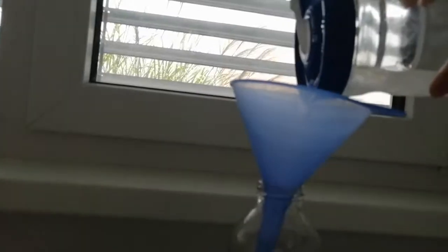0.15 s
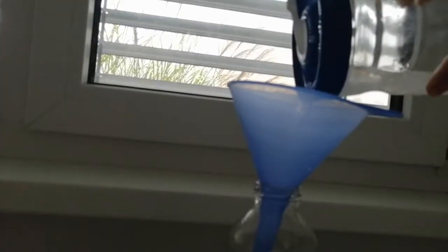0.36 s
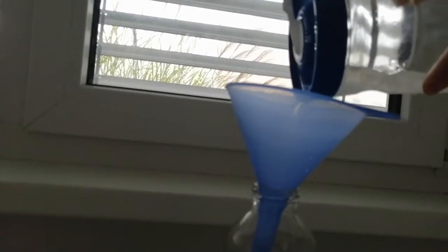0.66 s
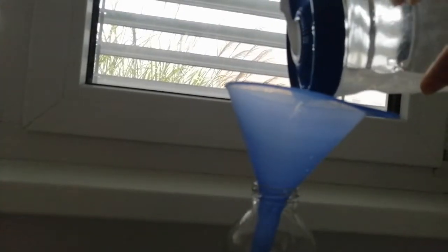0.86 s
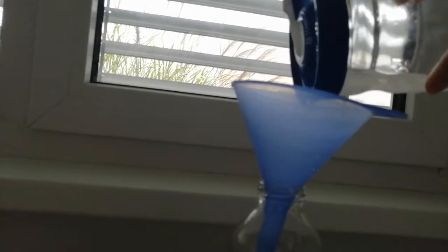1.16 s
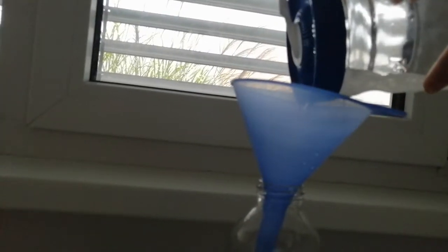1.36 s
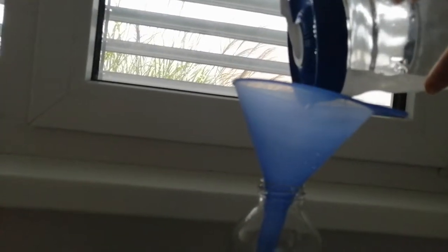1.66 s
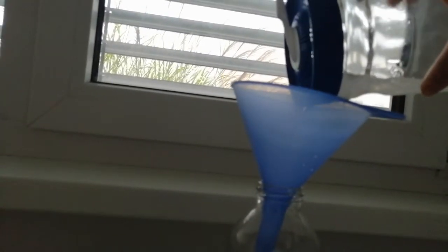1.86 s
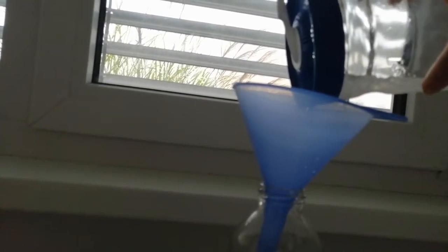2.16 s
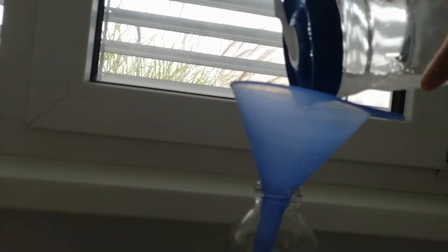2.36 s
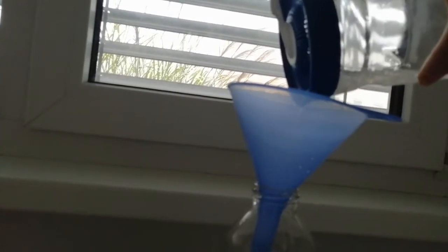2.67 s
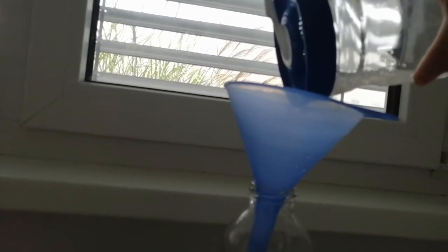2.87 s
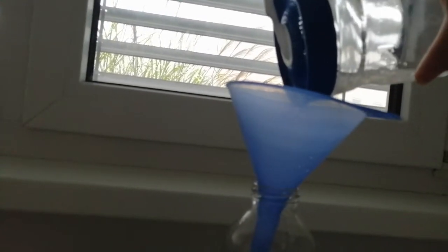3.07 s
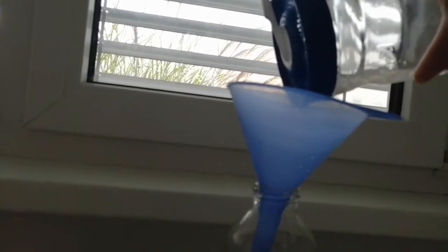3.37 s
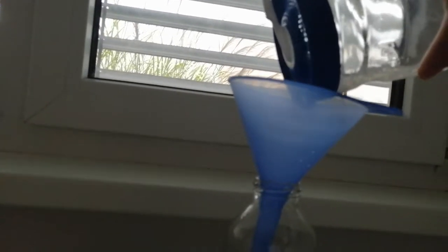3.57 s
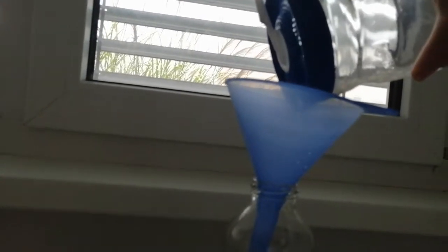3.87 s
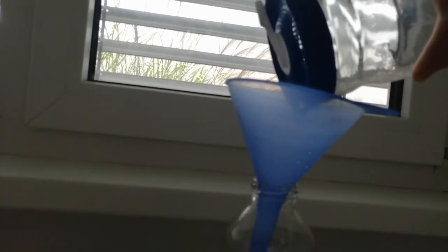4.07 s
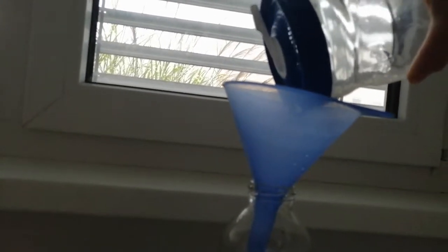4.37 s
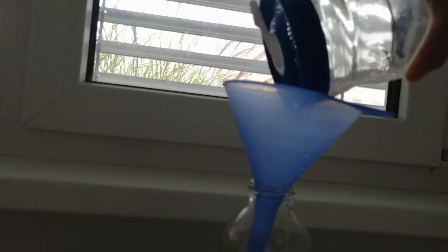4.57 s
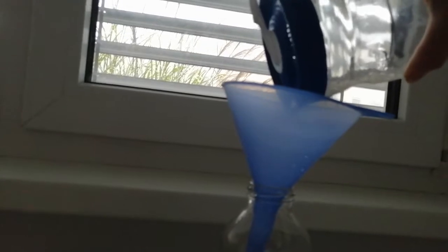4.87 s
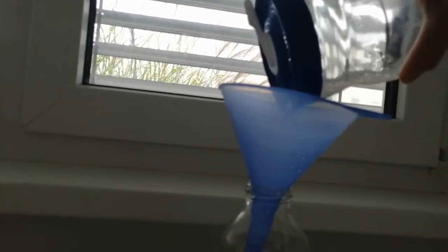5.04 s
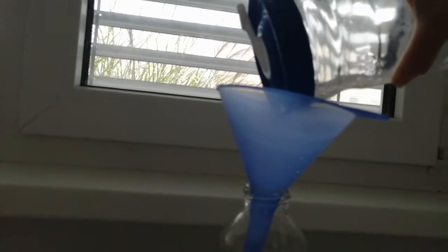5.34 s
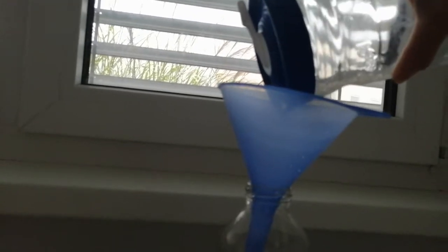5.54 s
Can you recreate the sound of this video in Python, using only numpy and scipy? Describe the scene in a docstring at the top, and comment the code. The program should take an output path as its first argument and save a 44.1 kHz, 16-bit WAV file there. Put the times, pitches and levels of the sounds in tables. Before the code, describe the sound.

A strong gurgling pour with hollow thumps rises in pitch, breaks into tinkling bubbles and droplets, and ends in near silence.

```python
"""Liquid pours from a jar's slotted lid into a plastic funnel on a glass bottle, close by in a window recess.
At first the full jet drums on the funnel; deep gulps ring as air bubbles and thump the hollow vessels.
As the stream thins the gulps rise in pitch, spray ticks, bubbles run in chains and the glass rings along.
Then lone bubbles sing, the last drips ping and a hand makes the microphone rumble, over faint room noise."""
import sys
import numpy as np
from scipy import signal
from scipy.fft import rfft, irfft
from scipy.io import wavfile

SR = 44100
rng = np.random.default_rng(int(sys.argv[2]) if len(sys.argv) > 2 else 0)


def generate_wav(signal):
    """Clip the signal to [-1, 1] and save it as 16-bit WAV at the path in sys.argv[1]."""
    frames = np.transpose(np.atleast_2d(signal))
    scaled = np.clip(frames, -1, 1) * 32767
    pcm = np.round(scaled).astype(np.int16)
    wavfile.write(sys.argv[1], SR, pcm)


N = 251811
TIME = np.arange(N) / SR

# the loud gulps: (time [s], strength [dB], bubble pitch [Hz], thump [dB])
GULPS = [(0.002, -26.5, 317.7, -37.5), (0.124, -51, 554, -56), (0.225, -34, 277, -40.5),
         (0.529, -41, 284, -43), (0.301, -39.5, 728, -39.5), (0.317, -23.5, 306, -34),
         (0.337, -25, 320, -39.5), (0.381, -41, 726, -37), (0.421, -25, 323, -51), (0.423, -41.5, 950, -62),
         (0.427, -43, 690, -61), (0.494, -48, 550, -40), (0.571, -23.5, 327.6, -32), (0.619, -45, 678, -40),
         (0.658, -27, 325, -33), (0.706, -25, 323, -41), (0.711, -37.5, 697, -78), (0.797, -35.5, 900, -37),
         (0.801, -39, 688, -42), (0.898, -43, 753, -41), (1.049, -46, 555, -65), (1.093, -35.5, 700, -43),
         (1.183, -35, 983, -32.5), (1.186, -27.5, 595, -61), (1.283, -40, 1014, -74),
         (1.303, -45.5, 940, -65), (1.334, -35.5, 950, -75), (1.389, -24.5, 924, -39.5),
         (1.429, -32, 1220, -69), (1.48, -38.5, 804, -43), (1.683, -42, 580, -45),
         (1.736, -35.5, 1134, -36.5), (1.81, -38.5, 1005, -73), (1.945, -43.5, 908, -67),
         (1.983, -42.5, 830, -75), (2.025, -35, 997, -51.5), (2.098, -43, 1000, -60),
         (2.153, -37.5, 980, -60), (2.172, -43, 960, -59), (2.216, -35, 956, -53), (2.245, -41.5, 957, -56),
         (2.265, -35, 870, -48.5), (2.297, -39, 950, -66), (2.318, -32.5, 840, -46), (2.422, -48, 817, -77),
         (2.532, -36.5, 750, -72), (2.547, -37, 290, -53), (2.563, -32.5, 718, -74),
         (2.769, -33.5, 1340, -48.5), (2.789, -37, 1170, -78), (2.85, -34.5, 1196, -46),
         (2.914, -38, 1520, -50.5), (3.032, -40.5, 1099, -49), (3.1, -37.5, 907, -51),
         (3.211, -53, 1740, -58), (3.266, -43.5, 1115, -56.5), (3.395, -42.5, 1436, -53.5),
         (3.607, -35.5, 1105, -48), (3.615, -39.5, 1230, -90), (3.714, -41.5, 1624, -61.5),
         (3.752, -45, 1440, -62), (3.818, -41, 1330, -52.5), (3.835, -42.5, 1236, -70),
         (3.902, -47, 1923, -63)]
# lone bubbles that sing on as the stream turns to drips, and long rings of the glass near 2050 Hz: (time [s],
# pitch [Hz], level [dB], ringing [cycles])
SINGERS = [(2.892, 1890, -45, 510), (3.212, 2047, -49, 1200), (3.905, 1853, -51, 580),
           (3.904, 2045, -55, 950), (4.239, 1560, -60.5, 107), (4.356, 1732, -58.5, 290),
           (5.581, 2965, -59.5, 420)]
# chains of bubbles dragged down by the thread of liquid:
# (time [s], length [s], first pitch [Hz], last pitch [Hz], level [dB])
CHAINS = [(0.94, 0.14, 875, 907, -47.5), (1.393, 0.11, 926, 763, -44.5), (1.507, 0.077, 576, 563, -47.5),
          (1.77, 0.081, 870, 706, -44.5), (1.984, 0.074, 816, 1110, -46.5), (2.1, 0.098, 974, 980, -47.5),
          (2.225, 0.096, 946, 950, -41), (2.335, 0.19, 850, 815, -52.5), (2.513, .14, 822, 650, -47.5),
          (2.779, 0.084, 1350, 1190, -45), (2.96, 0.044, 1820, 1680, -47.5),
          (3.039, 0.085, 1020, 947, -42.5), (3.269, 0.055, 1060, 1030, -46.5),
          (3.673, 0.068, 2160, 1600, -53.5)]
# the clearest droplets and tiny bursting bubbles: (time [s], strength [dB], pitch [Hz])
DROPS = [(0.056, -40, 5750), (0.0775, -33.5, 5720), (0.1324, -42.5, 5560), (0.1733, -32.5, 2505),
         (0.249, -38, 1577), (0.248, -44.5, 2580), (0.2858, -39.5, 6030), (0.381, -50, 6000),
         (0.47, -44, 1670), (0.5666, -52.5, 4370), (0.974, -51.5, 7760), (1.095, -47.5, 1890),
         (1.1574, -49, 2600), (1.159, -44, 1587), (1.215, -52.5, 7160), (1.4303, -44.5, 2565),
         (1.502, -47.5, 2620), (1.505, -40, 1653), (1.736, -56.5, 6040), (1.945, -51, 4300),
         (1.95, -50, 6970), (2.025, -40, 1790), (2.123, -53, 5730), (2.2648, -43.5, 1976),
         (2.295, -47.5, 9350), (2.389, -52.5, 5560), (2.529, -47, 4200), (2.56, -57, 2480),
         (2.62, -53, 2450), (2.729, -48.5, 2280), (2.756, -47, 4270), (2.832, -41.5, 3040),
         (2.873, -48, 3040), (2.924, -44.5, 4190), (2.973, -48.5, 1845), (2.986, -50, 6680),
         (3.204, -47, 2800), (3.211, -47, 2970), (3.2854, -46.5, 4080), (3.3953, -46.5, 6700),
         (3.3967, -44.5, 2464), (3.574, -43.5, 6800), (3.66, -50, 4110), (3.6742, -52.5, 2860),
         (3.7115, -52.5, 4240), (3.788, -51.5, 2434), (3.8265, -48, 2442), (3.83, -53, 3280)]
# fat drips that burst into a broad splash: (time [s], strength [dB], centre [Hz])
SPLASHES = [(0.076, -44, 5030), (0.286, -53, 4860), (1.432, -51.5, 3840), (2.832, -46, 2680),
            (2.924, -63, 3970), (3.205, -42, 2680), (3.394, -46, 2530), (3.83, -55.5, 2900)]
# last drips into calm liquid: (time [s], strength [dB], pitch [Hz], splash against the ping [dB])
DRIPS = [(4.2113, -53.5, 12800, -9), (4.227, -47.5, 6620, -3.5), (4.6473, -55, 11700, -5.5),
         (5.088, -53.5, 4210, -6), (5.5278, -60.5, 6650, -7), (5.539, -63, 5970, -14)]
# surges down the spout that make the hollow below boom: (time [s], level [dB])
SURGES = [(0.124, -37.5), (0.189, -39.5), (0.311, -39), (0.438, -39.5), (1.391, -54), (1.47, -45),
          (1.571, -49.5), (1.945, -45), (2.232, -47), (2.279, -47), (2.344, -46.5), (2.864, -50),
          (2.939, -49.5), (3.394, -54.5)]

# strength of the stream, which drives churning, burbling and spray: (time [s], level [dB])
FLOW = [(0.0, -34.5), (0.53, -34), (0.92, -36), (1.5, -37.5), (2.27, -55), (2.62, -44), (2.9, -61),
        (4.2, -79)]
# patter of the thinning stream on the shallow pool: (time [s], level [dB])
PATTER = [(1.0, -87), (2.0, -69), (2.6, -71), (3.1, -82.5)]
# the glass rings more freely as the jar empties: (time [s], level [dB])
GLASS_FREE = [(0, -25), (1.8, 16), (2.8, 18.5), (4, 19.5)]
# handling of the microphone: (time [s], level [dB])
HANDLING = [(5.044, -100), (5.288, -44), (5.386, -72), (5.442, -50.5), (5.7, -55.5)]

# bubble sizes in the deep gurgle under the full stream: (pitch [Hz], level [dB])
GURGLE = [(235, 0.5), (275, 6.5), (370, -3.5)]
# bubble sizes in the burble: (pitch [Hz], level [dB])
BURBLE = [(500, -3.5), (700, -1), (950, 8.5), (1300, -10.5), (1650, 7.5), (2200, -18.5)]
# bubble sizes where the full jet hits the funnel wall: (pitch [Hz], level [dB])
JET_SIZES = [(1350, -2), (1630, 22), (2100, -30)]
# bubble sizes in the spray: (pitch [Hz], level [dB])
SPRAY = [(2200, -4.5), (3200, 4.5), (4500, 2.5), (6000, 6), (8500, 3.5), (12000, 10), (15000, -7)]

# air resonances of funnel and bottle: (frequency [Hz], t60 [s], level [dB])
FUNNEL = [(543, 0.055, 9.5), (697, 0.16, 4), (825, 0.27, 0), (908, 0.1, 2), (1033, 0.17, -5),
          (1179.4, 0.08, 0.5), (1546, 0.11, -4), (1617, 0.16, -1)]
# ring of the glass: (frequency [Hz], t60 [s], level [dB])
GLASS = [(1901, 0.22, -4), (2086, 1, -4), (2417, 0.27, -1.5), (2670, 0.37, -9.5), (3196, 0.062, -12),
         (5000, 0.35, -11)]
# hollow resonances of the vessels and the recess: (frequency [Hz], t60 [s], level [dB])
HOLLOW = [(59.1, 0.92, 2), (122.2, 0.22, 8), (206.6, 0.058, -7.5), (273.2, 0.23, 10), (324.4, 0.19, 7)]
# valleys between the resonances of the vessels: (frequency [Hz], width [Hz], depth [dB])
VALLEYS = [(504, 110, -25), (1394, 380, -3.5)]
# how the two microphones hear the funnel: (frequency [Hz], left minus right [dB])
BALANCE = [(300, 0), (690, -8.5), (950, 0), (1300, -2), (2400, -2.5), (5000, -2), (8000, -6), (12000, 3.5)]
# colour of the quiet room: (frequency [Hz], density [dB per Hz])
AMBIENCE = [(20, -6), (90, -1), (128, -1.5), (200, -13.5), (300, -6.5), (480, -17.5), (1500, -21),
            (4000, -28), (7500, -34.5), (9000, -40.5), (15000, -43)]

# weak gulps come at random and shrink, so rise in pitch, as the jar empties
SMALL_GULP_HZ, SMALL_GULP_RISE_OCT_PER_S, SMALL_GULP_SPREAD_OCT = 568, 0.314, 0.3
# at first the full jet drums on the funnel wall; later the stream runs dry
JET_ENDS_S, JET_FADE_T60_S = 0.55, 0.59
DRY_S, DRY_FADE_T60_S, DRAIN_T60_S = 3.88, 0.63, 9
# the thinning stream spurts after each gulp; a full lull ends up this far below a fresh spurt
SPURT_T60_S, LULL_DB = 0.23, -5.5
AMBIENCE_DB, TOP_HZ = -69, 15200


def undb(db):
    """Decibels to gain."""
    return 10 ** (np.asarray(db) / 20)


def unit(x):
    """Scale to rms 1."""
    return x / np.sqrt(np.mean(x ** 2))


def curve(table):
    """Gain over time from a (time [s], level [dB]) table."""
    times, levels = np.array(table).T
    return undb(np.interp(TIME, times, levels))


def shape(points, hz):
    """Gain of a (frequency [Hz], level [dB]) spectrum at the given frequencies."""
    corners, levels = np.array(points).T
    return undb(np.interp(np.log(hz + 1), np.log(corners), levels))


def band(x, lo_hz, hi_hz, order=2):
    """Causal band-pass."""
    edges = [lo_hz, min(hi_hz, SR / 2 - 1)]
    return signal.sosfilt(signal.butter(order, edges, "band", fs=SR, output="sos"), x)


def fade(t, t60):
    """Exponential decay, 60 dB down after t60 seconds."""
    return np.exp(-np.log(1000) * t / t60)


def until(s, t60):
    """Gain that holds at 1 up to a time and then dies away."""
    return fade(np.maximum(TIME - s, 0), t60)


def add(track, s, sound):
    """Mix a sound in at a time."""
    start = int(np.clip(s * SR, 0, N - 1))
    track[start:start + len(sound)] += sound[:N - start]


def convolve(x, response):
    """Pass a sound through an impulse response."""
    return signal.fftconvolve(x, response)[:N]


def bubble(hz, cycles, glide, rise):
    """An air pocket swells over `rise` cycles and rings on; its pitch climbs by the share `glide` as it surfaces."""
    life = cycles / hz
    t = TIME[:int(life * SR) + 2]
    swell = (1 - np.exp(-hz * t / rise)) * fade(t, life)
    tone = np.sin(2 * np.pi * hz * t * (1 + glide * t / life / 2))
    return swell / swell.max() * tone


def burst(lo_hz, hi_hz, t60, attack_s):
    """A short wet crack of band-passed noise, its envelope peaking at 1."""
    t = TIME[:SR // 10]
    noise = rng.standard_normal(len(t)) * (1 - np.exp(-t / attack_s)) * fade(t, t60)
    crack = band(noise, lo_hz, hi_hz, order=3)
    return crack / np.abs(signal.hilbert(crack)).max()


def swarm(sizes, cycles, glide, rise, scatter_db, count):
    """Many bubbles at random times, rms 1; positive scatter makes a few much louder than the rest."""
    out = np.zeros(N)
    when, size, loud, life = rng.random((count, 4)).T
    lo, hi = sizes[0][0], sizes[-1][0]
    pitches = lo * (hi / lo) ** size
    gains = shape(sizes, pitches) * undb(-scatter_db * np.log(np.maximum(loud, 1 / 20)))
    lengths = cycles * (.5 + life)
    for s, hz, gain, length in zip(when * TIME[-1], pitches, gains, lengths):
        add(out, s, gain * bubble(hz, length, glide, rise))
    return unit(out)


def flow():
    """Strength of the stream over time, 1 at its fullest."""
    strength = curve(FLOW)
    return strength / strength.max()


def spurts():
    """Gain of the stream: strongest just after a gulp, sinking into lulls that deepen as it thins."""
    surge = np.minimum(sum((TIME >= row[0]) * until(row[0], SPURT_T60_S) for row in GULPS), 1)
    thinness = np.minimum(TIME / DRY_S, 1)
    return undb(LULL_DB * thinness * (1.5 - surge))


def gulps(rows, cycles=31, glide=0.074, rise=1.76, bubble_db=-3,
          splash_db=-20, splash_db_per_oct=5.0, splash_t60=0.029, splash_hz=880, slap_db=-7,
          trail_db=-11, trail_s=0.054, trail_t60=0.8, trail_spread=0.19):
    """Each gulp traps one large bubble and throws up a splash; a string of like-sized bubbles breaks off after it."""
    out = np.zeros(N)
    deepest_hz = min(row[2] for row in rows)
    for s, db, hz, *_ in rows:
        add(out, s, undb(db + bubble_db) * bubble(hz, cycles, glide, rise))
        # smaller gulps splash brighter, and more for their size
        wet_hz = splash_hz * (hz / deepest_hz) ** 0.29
        wet_db = db + splash_db + splash_db_per_oct * np.log2(hz / deepest_hz)
        add(out, s, undb(wet_db) * burst(wet_hz / 1.79, wet_hz * 1.217, splash_t60, attack_s=0.0064))
        add(out, s, undb(wet_db + slap_db) * burst(690, 1800, splash_t60, attack_s=0.00034))
        for late, size in rng.random(size=(4, 2)):
            delay = trail_s * late
            trailing = bubble(hz * (1 + trail_spread * (2 * size - 1)), cycles, glide, rise)
            add(out, s + delay, undb(db + bubble_db + trail_db) * fade(delay, trail_t60) * trailing)
    return out


def small_gulps(small_db=-47, flow_power=0.22, scatter_db=3, count=32):
    """Rows of weak gulps, unevenly spaced through the pour; they weaken with the stream."""
    late, size, loud = rng.random((count, 3)).T
    times = (np.arange(count) + late) / count * DRY_S
    octaves = SMALL_GULP_RISE_OCT_PER_S * times + SMALL_GULP_SPREAD_OCT * (2 * size - 1)
    pitches = SMALL_GULP_HZ * 2 ** octaves
    stream_db = 20 * np.log10(np.interp(times, TIME, flow() * spurts()))
    levels = small_db + flow_power * stream_db + scatter_db * (2 * loud - 1)
    return list(zip(times, levels, pitches))


def trickle(gurgle_db=-43.0, gurgle_power=4.2, burble_db=-56.5, burble_power=0.36,
            jet_db=-61, rush_db=-63, spray_db=-75, crackle_db=-76, spray_power=0.026,
            jet_spray_db=6, jet_spray_t60=1.2):
    """The stream gurgles deeply while full, burbles with mid-sized bubbles, fizzes and crackles with fine ones."""
    gurgle = swarm(GURGLE, cycles=37.0, glide=0.025, rise=0.46, scatter_db=-0.5, count=1400)
    burble = swarm(BURBLE, cycles=28.3, glide=0.12, rise=0.44, scatter_db=4.5, count=5500)
    bubbling = undb(gurgle_db) * gurgle * flow() ** gurgle_power
    bubbling += undb(burble_db) * burble * flow() ** burble_power
    # the full jet drums and rushes on the funnel wall
    drumming = swarm(JET_SIZES, cycles=35, glide=0.024, rise=1.0, scatter_db=0, count=4000)
    rush = unit(band(rng.standard_normal(N), 830, 2060))
    jet = (undb(jet_db) * drumming + undb(rush_db) * rush) * until(JET_ENDS_S, JET_FADE_T60_S)
    spray = swarm(SPRAY, cycles=47, glide=0.051, rise=2.2, scatter_db=6.0, count=4500)
    crackle = swarm(SPRAY, cycles=18, glide=0, rise=.8, scatter_db=7, count=350)
    # the first gush throws extra spray
    gush = 1 + undb(jet_spray_db) * fade(TIME, jet_spray_t60)
    fine = (undb(spray_db) * spray + undb(crackle_db) * crackle) * flow() ** spray_power * gush
    return spurts() * until(DRY_S, DRY_FADE_T60_S) * (bubbling + jet + fine)


def chains(chain_db=-4, spread=0.04, cycles=26, glide=0.0097):
    """Bubbles follow each other closely and grow or shrink along a chain, so its pitch glides."""
    out = np.zeros(N)
    for start, length, first_hz, last_hz, db in CHAINS:
        chance = rng.random(size=(14, 3))
        for k, (late, size, loud) in enumerate(chance):
            along = (k + late) / len(chance)
            hz = (first_hz + (last_hz - first_hz) * along) * (1 + spread * (2 * size - 1))
            gain = undb(db + chain_db) * (.5 + loud)
            add(out, start + along * length, gain * bubble(hz, cycles, glide, rise=0.79))
    return out


def drops(cycles=80, glide=.03, rise=2, ping_db=-3, click_db=-11, click_t60=0.027,
          fizz_db=-8, fizz_t60=0.0074,
          spatter_db=-14, spatter_s=0.039, spatter_oct=0.32, spatter_cycles=30):
    """Each droplet gives a click, a fizz, the high ping of a tiny bubble and a spatter of others near its size."""
    out = np.zeros(N)
    for s, db, hz in DROPS:
        add(out, s, undb(db + ping_db) * bubble(hz, cycles, glide, rise))
        add(out, s, undb(db + fizz_db) * burst(hz / 1.22, hz * 1.194, fizz_t60, attack_s=0.0016))
        add(out, s, undb(db + click_db) * burst(2800, 10500, click_t60, attack_s=0.0002))
        for late, size in rng.random(size=(5, 2)):
            speck = bubble(hz * 2 ** (spatter_oct * (2 * size - 1)), spatter_cycles, glide, rise)
            add(out, s + spatter_s * late, undb(db + spatter_db) * (1 - late / 2) * speck)
    return out


def splashes(width=1.18, splash_t60=0.081):
    """A fat drip cracks on the pool and scatters into a broad, quickly dying splash."""
    out = np.zeros(N)
    for s, db, hz in SPLASHES:
        add(out, s, undb(db) * burst(hz / width, hz * width, splash_t60, attack_s=0.00087))
    return out


def patter():
    """Small bubbles crowd between the gulps once the stream is thin, and keep nudging the glass."""
    crowd = swarm([(1700, 0), (3400, -2)], cycles=30, glide=0.027, rise=1, scatter_db=5, count=1300)
    return crowd * curve(PATTER) * spurts() * until(DRY_S, DRY_FADE_T60_S)


def singers(sing_db=-3, climb_cycles=18):
    """Lone bubbles in calm liquid, and the glass near 2050 Hz, ring long and clean; the fewer the cycles, the
    more the pitch climbs."""
    out = np.zeros(N)
    for s, hz, db, cycles in SINGERS:
        add(out, s, undb(db + sing_db) * bubble(hz, cycles, climb_cycles / cycles, rise=6.5))
    return out


def drips(ping_db=-3, cycles=170, glide=0.059, splash_t60=0.024, splash_width=0.31, click_db=-17):
    """The last drips ping in calm liquid, each with a faint click and a narrow splash around its pitch."""
    out = np.zeros(N)
    edge = 1 + splash_width / 2
    for s, db, hz, splash_db in DRIPS:
        add(out, s, undb(db + ping_db) * bubble(hz, cycles, glide, rise=0.73))
        add(out, s, undb(db + splash_db) * burst(hz / edge, hz * edge, splash_t60, attack_s=0.0021))
        add(out, s, undb(db + click_db) * burst(2500, 11000, 0.11, attack_s=0.00076))
    return out


def valleys(x):
    """Between their resonances the vessels pass little sound."""
    for hz, width_hz, db in VALLEYS:
        x = x - (1 - undb(db)) * band(x, hz - width_hz / 2, hz + width_hz / 2, order=1)
    return x


def resonate(x, modes, wander, wander_hz=9):
    """Modes whose pitch wanders by a share as the liquid sloshes; each level is the gain at its resonance."""
    out = np.zeros(N)
    for hz, t60, db in modes:
        slosh = np.interp(TIME * wander_hz, np.arange(300), rng.standard_normal(size=300))
        turn = np.exp(2j * np.pi * np.cumsum(hz * (1 + wander * slosh)) / SR)
        keep = fade(1 / SR, t60)
        # shift the mode down to 0 Hz, smooth it there, and shift it back up
        smoothed = signal.lfilter([1 - keep], [1, -keep], x * turn.conj())
        out += 2 * undb(db) * (turn * smoothed).real
    return out


def ring(modes):
    """Impulse response of a set of decaying modes; each level is the gain at its resonance."""
    t = TIME[:SR]
    response = np.zeros(len(t))
    for hz, t60, db in modes:
        decay = fade(t, t60)
        response += 2 * undb(db) * decay / decay.sum() * np.cos(2 * np.pi * hz * t)
    return response


def hollow(thump_db=5, churn_db=-49, churn_power=0.31, push_s=0.0014, side_db=-17, stray_db=-15):
    """Gulps and the churning stream push on the air in the vessels, which booms at its low resonances."""
    pushes = np.zeros(N)
    response = convolve(np.exp(-TIME[:SR // 20] / push_s), ring(HOLLOW))
    for s, _, _, db in GULPS:
        add(pushes, s, [undb(db + thump_db) / np.abs(response).max()])
    churning = undb(churn_db) * flow() ** churn_power * spurts() * until(DRY_S, DRAIN_T60_S)
    churn, stray = rng.standard_normal((2, N)) * churning / np.linalg.norm(response)
    boom = convolve(pushes + churn, response)
    # the standing waves reach the two microphones slightly out of step
    side = undb(side_db) * signal.hilbert(boom).imag + undb(stray_db) * convolve(stray, response)
    return np.array([boom + side, boom - side])


def surges(boom_db=0, cycles=17, rise=8.7):
    """A slug of liquid pushes softly on the enclosed air, which swells at its second hollow resonance."""
    out = np.zeros(N)
    for s, db in SURGES:
        add(out, s, undb(db + boom_db) * bubble(HOLLOW[1][0], cycles, 0, rise))
    return out


def recess(x, early_db=-4, early_t60=0.15, tail_db=-11, tail_t60=0.42, treble_db=7, build_s=0.00021):
    """Pane and walls answer within milliseconds, then the small room dies away; each ear gets its own echoes."""
    t = TIME[:SR // 2]
    arrived = 1 - np.exp(-t / build_s)
    ears = []
    for _ in range(2):
        early = rng.standard_normal(len(t)) * fade(t, early_t60) * arrived
        tail = rng.standard_normal(len(t)) * fade(t, tail_t60) * arrived
        echoes = undb(early_db) * early / np.linalg.norm(early) + undb(tail_db) * tail / np.linalg.norm(tail)
        # the treble bounces out of the funnel mouth and arrives mostly as echoes
        treble = band(echoes, 3370, 29000, order=1)
        echoes = band(echoes, 610, 28000, order=1) + (undb(treble_db) - 1) * treble
        ears.append(x + convolve(x, echoes))
    return np.array(ears)


def place(ears):
    """Tilt the balance between the microphones band by band."""
    lean = np.sqrt(shape(BALANCE, np.arange(N // 2 + 1) * SR / N))
    return irfft(rfft(ears) * np.array([lean, 1 / lean]), N)


def handling(rumble_db=-1):
    """The hand shifts on the microphone after the pour: a very low rumble of band-passed noise."""
    rumble = band(rng.standard_normal(N), 19, 31, order=4)
    return undb(rumble_db) * curve(HANDLING) * unit(rumble)


def ambience(apart_hz=700):
    """Faint room noise, alike on both sides in the bass and unrelated in the treble."""
    hz = np.arange(N // 2 + 1) * SR / N
    mid, side = rfft(rng.standard_normal((2, N))) * shape(AMBIENCE, hz)
    mid = irfft(mid, N)
    side = irfft(side * np.minimum(hz / apart_hz, 1), N)
    return undb(AMBIENCE_DB) * np.array([mid + side, mid - side]) / mid.std()


def scene(open_db=-3.0):
    """The stream sounds through the open funnel, its air and the glass; the last drips are too light to ring them."""
    liquid = gulps(GULPS + small_gulps()) + trickle() + chains() + drops() + splashes() + patter()
    liquid = valleys(liquid)
    funnel = resonate(liquid, FUNNEL, wander=0.019)
    glass = resonate(liquid * curve(GLASS_FREE), GLASS, wander=0.0042, wander_hz=24.98)
    pour = undb(open_db) * (liquid + drips()) + funnel + glass + singers()
    return place(recess(pour)) + hollow() + surges() + handling() + ambience()


def record(dry):
    """The recorder cuts the top with a steep low-pass."""
    return signal.sosfilt(signal.ellip(8, .2, 70, TOP_HZ, fs=SR, output="sos"), dry)


dry = scene()
out = record(dry)
generate_wav(out)
```